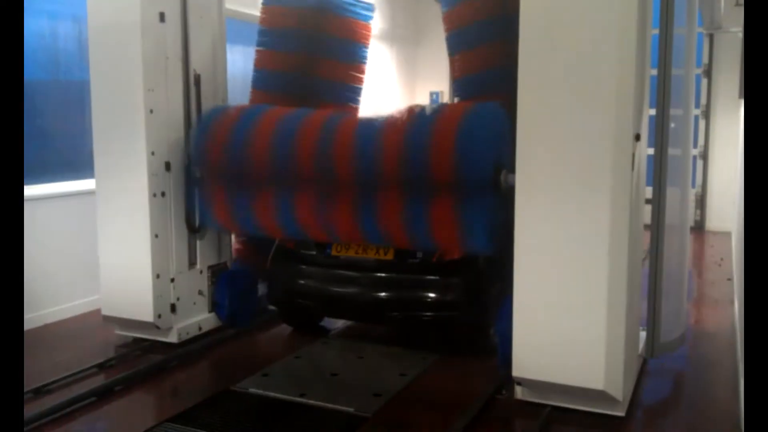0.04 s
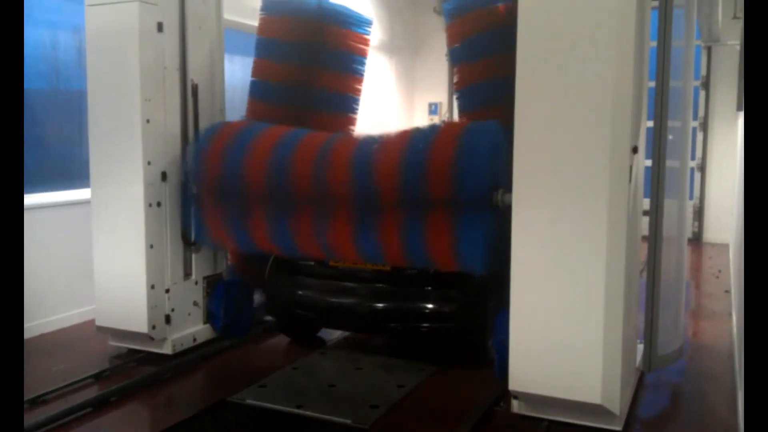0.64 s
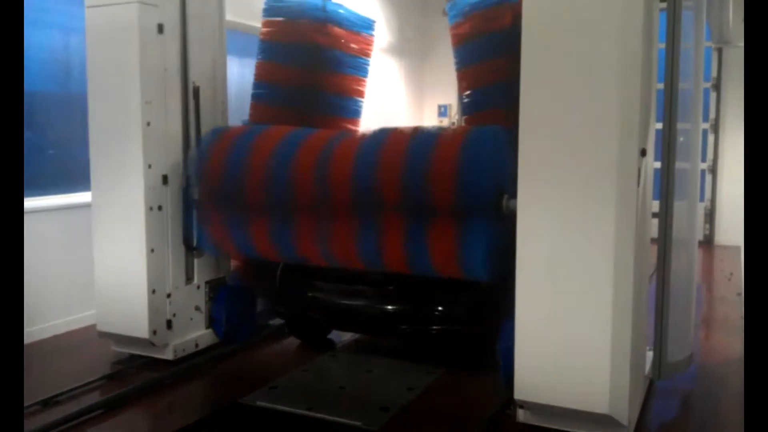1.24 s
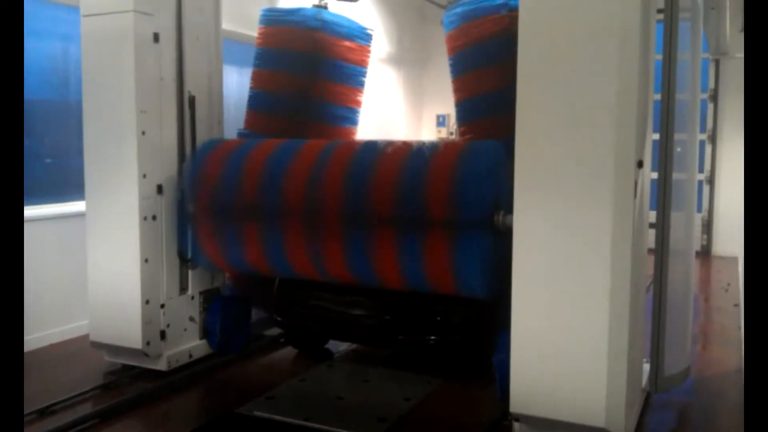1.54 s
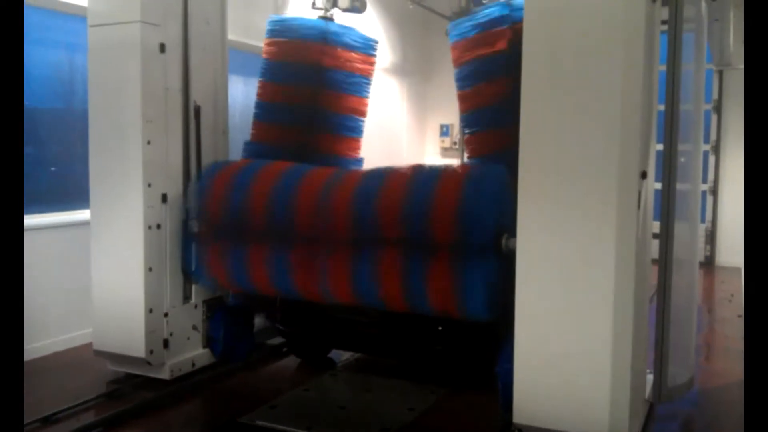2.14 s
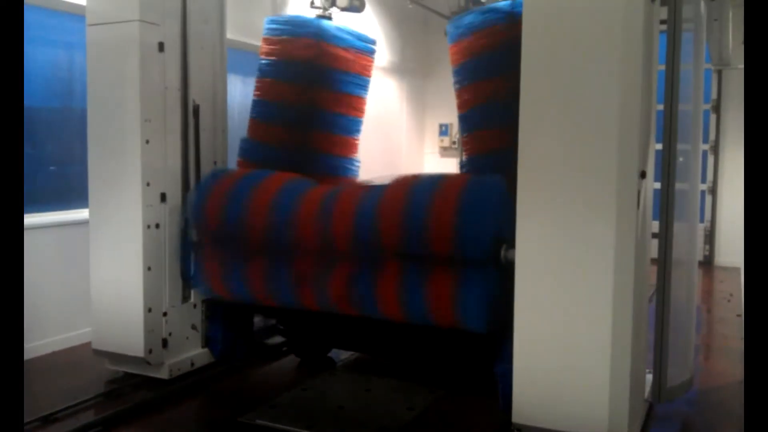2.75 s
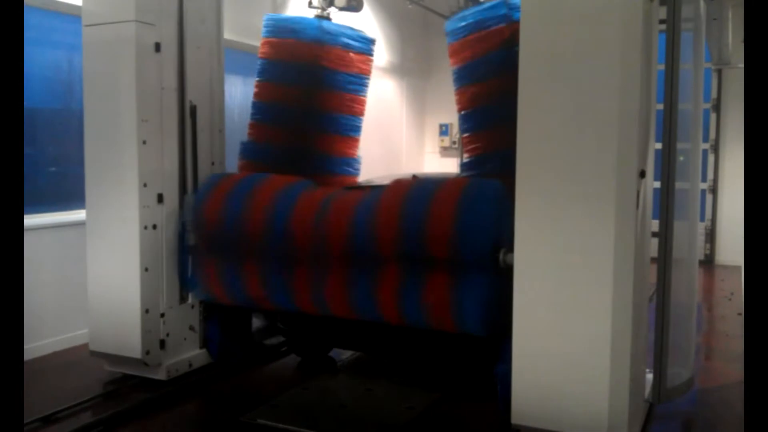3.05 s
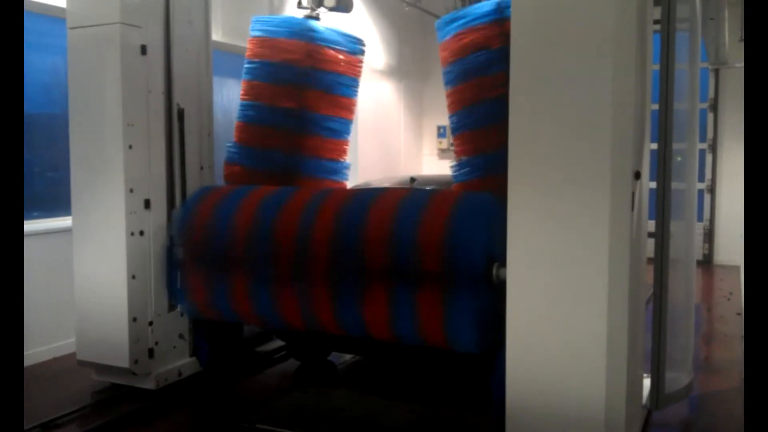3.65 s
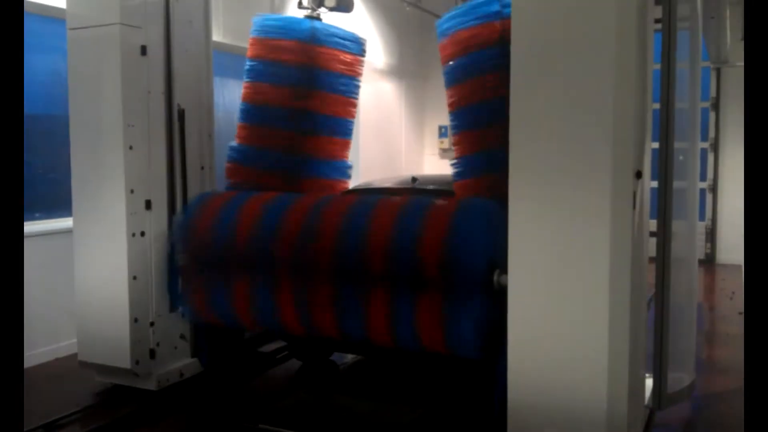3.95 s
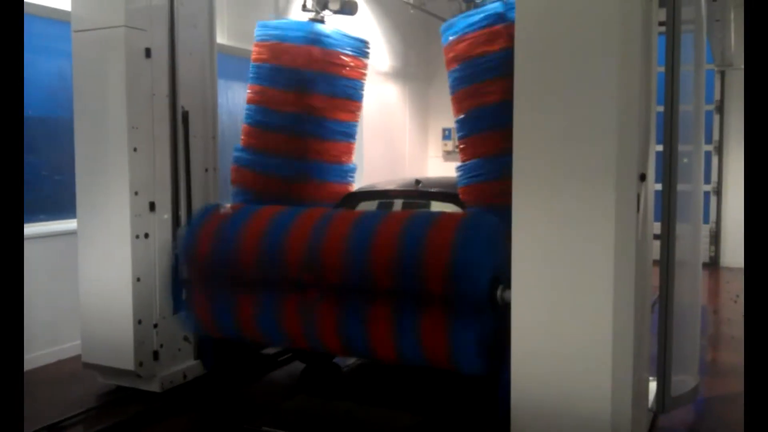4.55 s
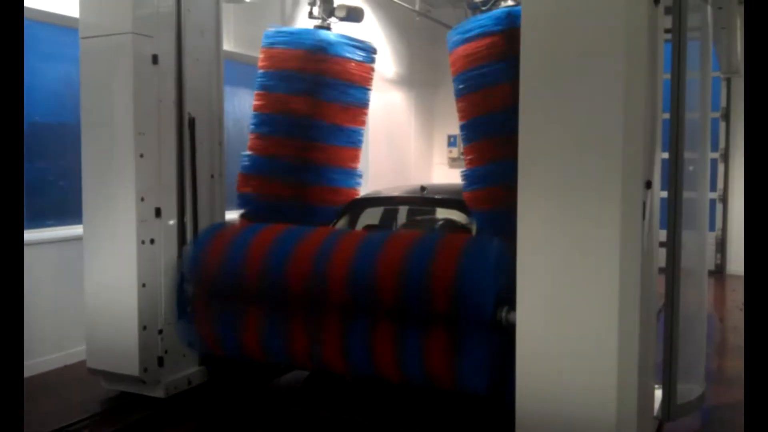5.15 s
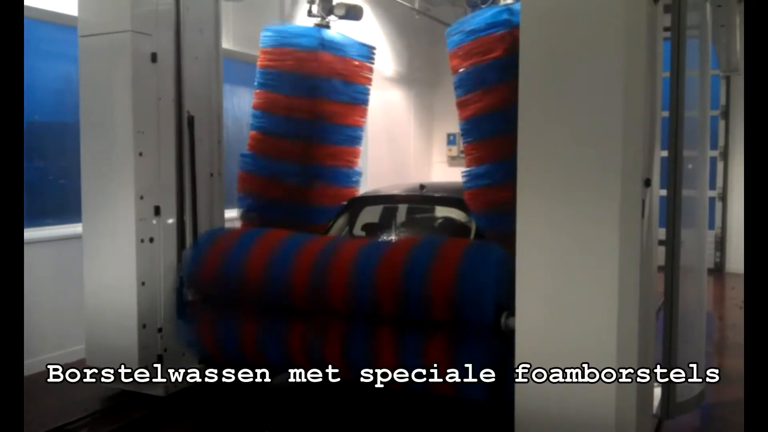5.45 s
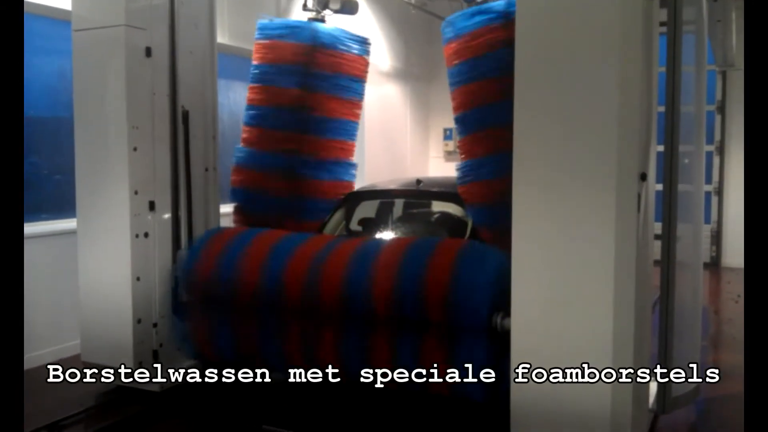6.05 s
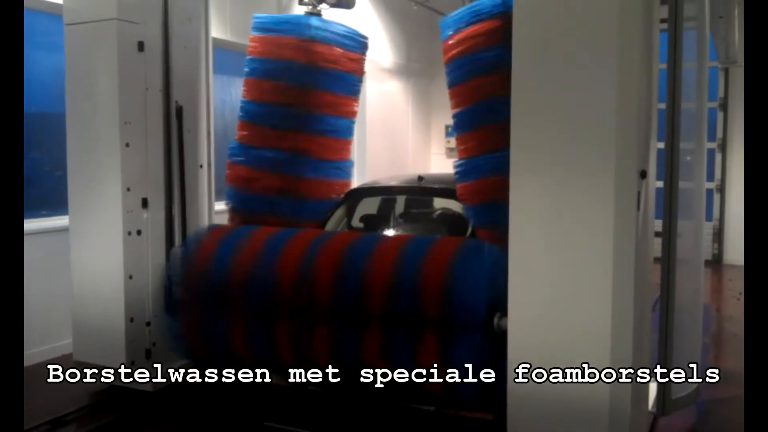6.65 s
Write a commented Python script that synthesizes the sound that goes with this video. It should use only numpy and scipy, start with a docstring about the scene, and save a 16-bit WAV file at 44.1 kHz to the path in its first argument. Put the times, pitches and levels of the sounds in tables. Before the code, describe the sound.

After a brief silence, a car wash cuts in: foam brushes flogging wet panels, steady spray hiss and a high fizz.

```python
"""After a short silence, the slapping and hissing of a car wash cuts in abruptly, in a hard-walled hall.
Spinning foam brushes flog the wet car: slaps on the hard front panels and a wet swish lead, then ease
off over a duller drumming on the bonnet. Nozzles hiss and the gantry rumbles faintly. The din
overloads a small mono microphone, whose high fizz rises and falls."""
import sys
import numpy as np
from scipy import signal
from scipy.fft import rfft, irfft, next_fast_len
from scipy.io import wavfile
from scipy.ndimage import map_coordinates

SR = 44100
rng = np.random.default_rng(int(sys.argv[2]) if len(sys.argv) > 2 else 0)


def inscribe(sig):
    """Save sig as 16-bit PCM at rate SR to the path in sys.argv[1].

    A 1-D sig is mono; a 2-D sig holds one channel per row.
    Samples are clipped to [-1, 1] before scaling.
    """
    pcm = np.round(np.clip(np.atleast_2d(sig).T, -1, 1) * 32767)
    wavfile.write(sys.argv[1], SR, pcm.astype(np.int16))


N = 300321
TIME = np.arange(N) / SR

# Blows on the wet panels: (time [s], relative slap level [dB], relative swish level [dB])
PANEL_BLOWS = [(0.72, -32, -28.5), (1.0, -29, -27.5), (1.33, -31.0, -30.0), (1.65, -36.5, -33.0),
               (2.02, -32.5, -30.5), (2.3, -32.0, -29.5), (2.58, -34.5, -34), (2.85, -32, -32.5),
               (3.4, -37, -35.5), (3.58, -37.5, -32), (3.9, -41, -37), (4.05, -38, -41), (4.72, -40, -40.5),
               (4.9, -38.0, -38.5), (5.28, -35.5, -43), (5.52, -39.5, -43), (5.83, -36, -38.5),
               (6.25, -40.5, -40), (6.8, -40, -41)]
# Blows on the bonnet: (time [s], relative level [dB])
BONNET_BLOWS = [(0.72, -41.5), (1.7, -43.5), (2.2, -42), (2.6, -44.0), (3.0, -42.5), (3.35, -44),
                (3.98, -41), (4.25, -47), (4.42, -42), (4.7, -42.5), (5.85, -39.5), (6.25, -41.0),
                (6.7, -45)]
# Spectra of the three brush sounds: (frequency [Hz], relative level [dB])
DRUM_SPECTRUM = [(120, -32), (195, -13), (245, -3), (310, -1), (380, 0.5), (435, -2), (520, -1),
                 (700, -21.5), (1200, -29), (3000, -50)]
SLAP_SPECTRUM = [(300, -36), (490, -3), (575, 0.5), (670, 1), (800, 1), (980, -2), (1200, -8.5),
                 (2000, -31), (5000, -50)]
SWISH_SPECTRUM = [(500, -23), (900, -3.5), (1100, 0), (1280, -1.5), (1450, -3), (1850, -3), (2400, -6),
                  (3200, -9.5), (5000, -11), (9000, -46), (15000, -40)]

def brushes():
    """Foam strips land in bunches: they drum the bonnet, slap the panels and swish through water."""
    slap_db, swish_db = curves(PANEL_BLOWS)
    drum_db, = curves(BONNET_BLOWS)
    contact_db = 0.4 * wobble(per_s=14)  # the roller meets the car unevenly
    bunches = amp(0.6 * wobble(per_s=40) + 1.9 * wobble(per_s=120))
    drum = in_hall(bunches * impacts(per_s=2500, scatter_db=2), wet_db=-1, t60_s=0.6)
    slap = in_hall(bunches * impacts(per_s=1800, scatter_db=3), wet_db=-3, t60_s=0.79)
    swish = in_hall(bunches * impacts(per_s=1400, scatter_db=4.5), wet_db=-4, t60_s=0.4)
    blows = amp(drum_db - 1.3) * coloured(drum, DRUM_SPECTRUM)
    blows += amp(slap_db - 3) * coloured(slap, SLAP_SPECTRUM)
    blows += amp(swish_db) * coloured(swish, SWISH_SPECTRUM)
    return filtered(amp(contact_db) * blows, panel_response)


# Panel resonances: (frequency [Hz], width [Hz], boost [dB])
PANEL_MODES = [(378, 26, 1), (587, 28, 2.5), (668, 28, 3.5), (772, 22, 2.5), (832, 12, 2), (1258, 15, 4.5),
               (1305, 18, 1.5), (1372, 15, 3)]

def panel_response(hz):
    """The plain blow plus the ring of the sheet metal."""
    response = 1
    for mode_hz, width_hz, boost_db in PANEL_MODES:
        damping = 1j * hz * width_hz
        response += (amp(boost_db) - 1) * damping / (mode_hz ** 2 - hz ** 2 + damping)
    return response


# Nozzle hiss: (frequency [Hz], relative level [dB])
JET_SPECTRUM = [(500, -27.5), (1500, -7.5), (2700, -5.5), (3700, -2.5), (4700, -2), (6200, -0.5),
                (7900, -3), (9000, -6.5), (10500, -12.5), (13000, -23), (15700, -27)]

def spray():
    """Water jets hiss; drops patter on paint and floor."""
    surge_s, surge_width_s, surge_db = 3.33, 0.25, 1.7  # the hiss swells once
    jet_db = -30.5 + surge_db * np.exp(-((TIME - surge_s) / surge_width_s) ** 2)
    drops = in_hall(impacts(per_s=3000, scatter_db=2.5), wet_db=-1, t60_s=0.4)
    jets = coloured(rng.standard_normal(N) + amp(-5) * drops, JET_SPECTRUM)
    return amp(jet_db + 0.44 * wobble(per_s=25)) * jets


# Microphone fizz: (time [s], relative level [dB])
FIZZ_LEVELS = [(0.72, -34.0), (1.0, -32.5), (1.75, -39), (2.25, -34.5), (3.5, -35.0), (3.68, -38.0),
               (4.25, -41.5), (6.2, -38.0), (6.5, -41)]
# Its spectrum: (frequency [Hz], relative level [dB])
FIZZ_SPECTRUM = [(2000, -24), (6000, -11.5), (9000, -4), (11000, 0.5), (13000, 1), (15700, -1)]

def fizz():
    """High fizz of the overloaded microphone: crackly noise that rises and falls."""
    fizz_db, = curves(FIZZ_LEVELS)
    crackle = rng.standard_normal(N) + impacts(per_s=4000, scatter_db=2.5)
    return amp(fizz_db + 0.1 + 0.7 * wobble(per_s=40)) * coloured(crackle, FIZZ_SPECTRUM)


# Drives and frame: (frequency [Hz], relative level [dB])
RUMBLE_SPECTRUM = [(10, -10), (30, -15), (70, -0.5), (130, 4), (180, 4.5), (280, -4), (700, -38)]

def gantry():
    """The drives rumble faintly, and the frame shakes with the load on the brushes."""
    _, swish_db = curves(PANEL_BLOWS)
    load_db = swish_db + 36  # 0 dB at a middling load
    drive_db, shake_db = -62, -65.5 + 1.15 * load_db
    gain = np.hypot(amp(drive_db), amp(shake_db)) * amp(0.53 * wobble(per_s=11))
    return gain * coloured(rng.standard_normal(N), RUMBLE_SPECTRUM)


def in_hall(x, wet_db, t60_s):
    """Direct sound plus a diffuse tail that follows its power and dies away, at rms 1."""
    decay = np.exp(-np.log(1e6) / (t60_s * SR))
    tail_power = signal.lfilter([1 - decay], [1, -decay], x ** 2)
    return unit(x + amp(wet_db) * np.sqrt(tail_power) * rng.standard_normal(N))


def impacts(per_s, scatter_db):
    """Tiny blows of uneven size at random moments, at rms 1."""
    struck = rng.random(N) < per_s / SR
    return unit(struck * rng.choice([-1, 1], N) * amp(scatter_db * rng.standard_normal(N)))


def amp(db):
    """Decibels to gain."""
    return 10 ** (np.asarray(db) / 20)


def unit(x):
    """Scale to rms 1."""
    return x / np.sqrt(np.mean(x ** 2) + 1e-20)


def gain_at(spectrum, hz):
    """Gain of a spectrum, interpolated in dB over log frequency."""
    points_hz, points_db = np.transpose(spectrum)
    return amp(np.interp(np.log(hz + 1), np.log(points_hz + 1), points_db))


def curves(rows):
    """One value per sample for each column after the time."""
    times_s, *columns = np.transpose(rows)
    return [np.interp(TIME, times_s, column) for column in columns]


def wobble(per_s):
    """A smooth curve through per_s random knots a second."""
    knots = rng.standard_normal(int(N * per_s / SR) + 4)
    return map_coordinates(knots, [TIME * per_s])


def filtered(x, response):
    """Apply a complex frequency response."""
    size = next_fast_len(N + SR // 2)
    hz = np.fft.rfftfreq(size, 1 / SR)
    return irfft(rfft(x, size) * response(hz), size)[:N]


def coloured(x, spectrum):
    """Shape by a spectrum, at rms 1."""
    return unit(filtered(x, lambda hz: gain_at(spectrum, hz)))


def scene():
    """One microphone, the same in both channels."""
    wash = brushes() + spray() + fizz() + gantry()
    return np.array([wash, wash])


def overload(x, ceiling_db, knee):
    """The input stage rounds off the peaks, spreading fizz into the treble."""
    return x / (1 + np.abs(x / amp(ceiling_db)) ** knee) ** (1 / knee)


# Treble lift ahead of the input stage: (frequency [Hz], gain [dB])
TREBLE_LIFT = [(1500, 0), (4000, -0.5), (8000, 6), (12000, -1.5)]

def record(dry):
    """Lifted treble overloads first and is evened out; the sound switches on abruptly, band-limited."""
    input_gain_db, switch_on_s, cutoff_hz = 1.5, 0.7143, 15750
    lifted = filtered(dry[0], lambda hz: gain_at(TREBLE_LIFT, hz))
    driven = overload(amp(input_gain_db) * lifted, ceiling_db=-20, knee=3.2)
    evened = filtered(driven, lambda hz: 1 / gain_at(TREBLE_LIFT, hz))
    switched = evened * (TIME >= switch_on_s)
    sound = filtered(switched, lambda hz: 1 / (1 + (hz / cutoff_hz) ** 400))
    return np.array([sound, sound])


dry = scene()
out = record(dry)
inscribe(out)
```